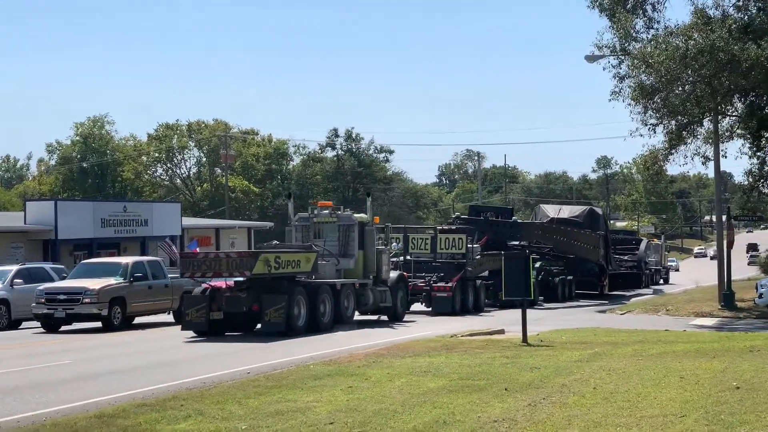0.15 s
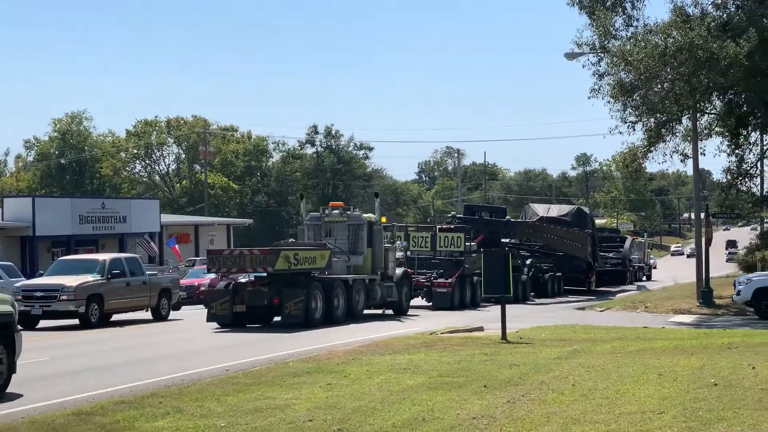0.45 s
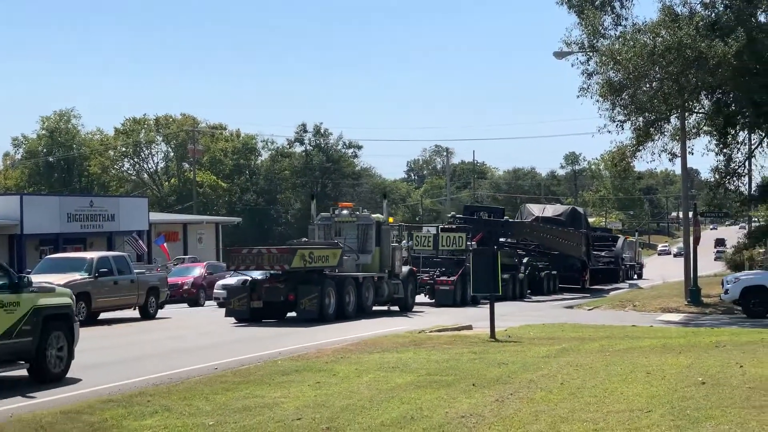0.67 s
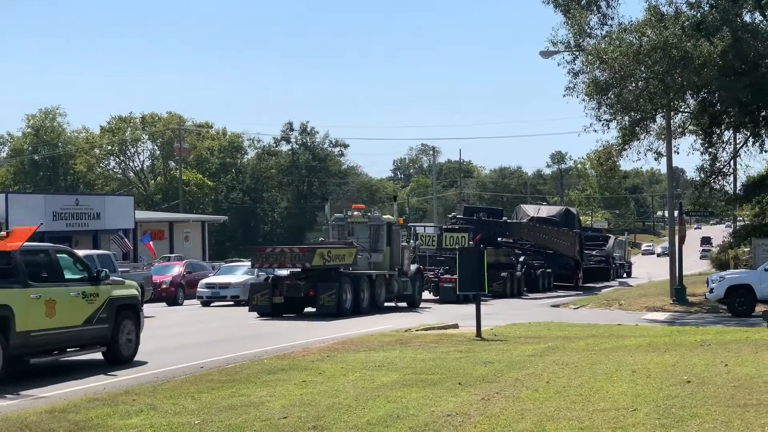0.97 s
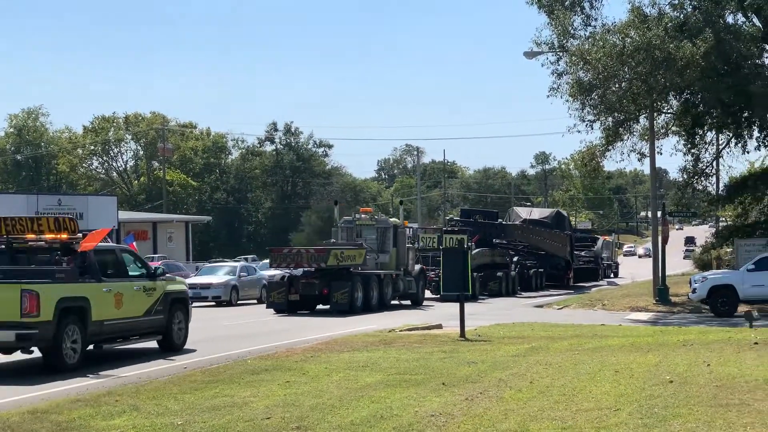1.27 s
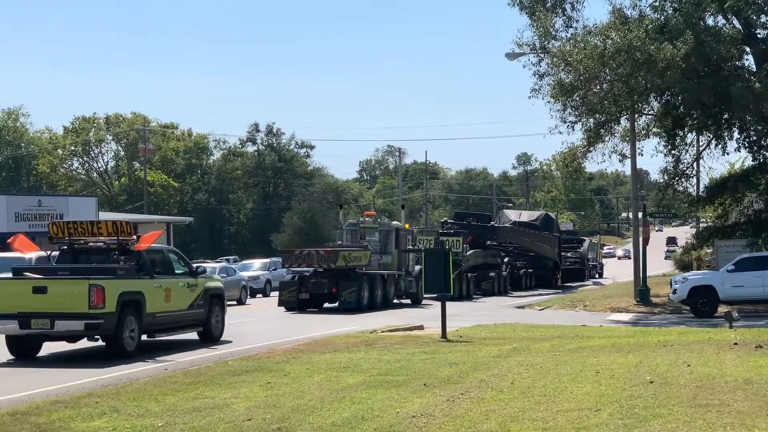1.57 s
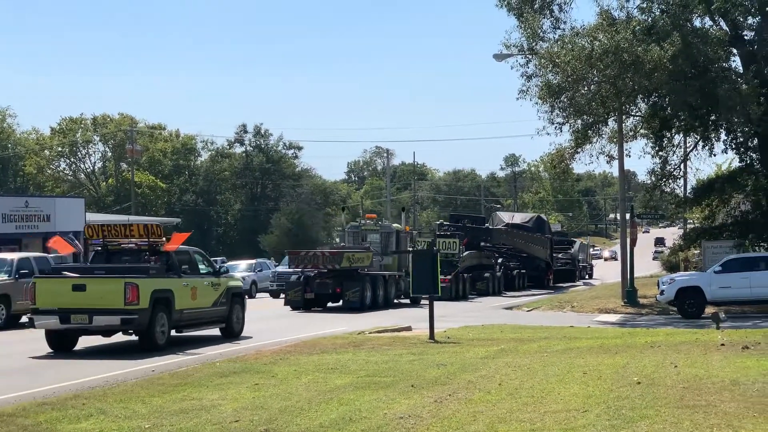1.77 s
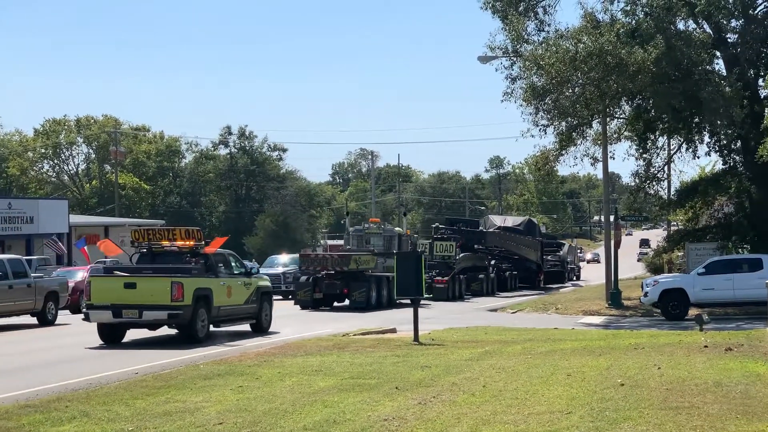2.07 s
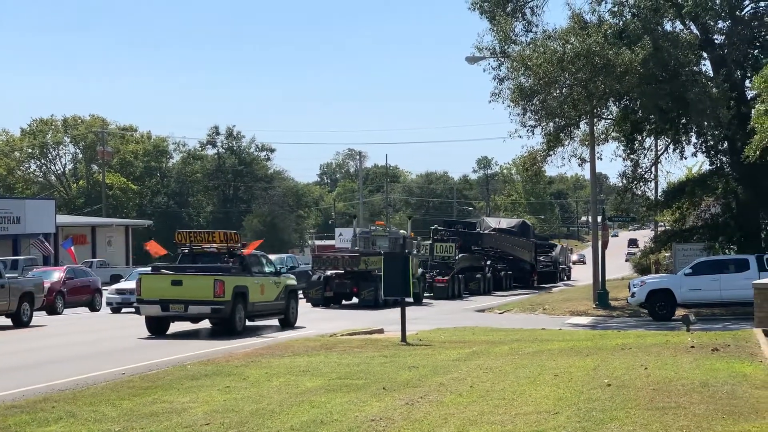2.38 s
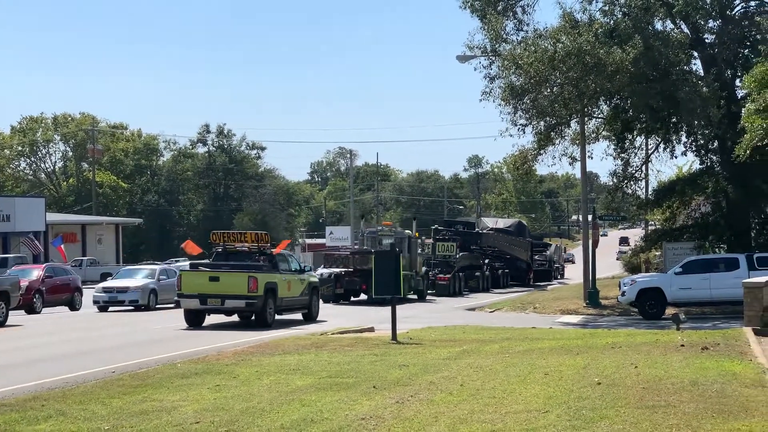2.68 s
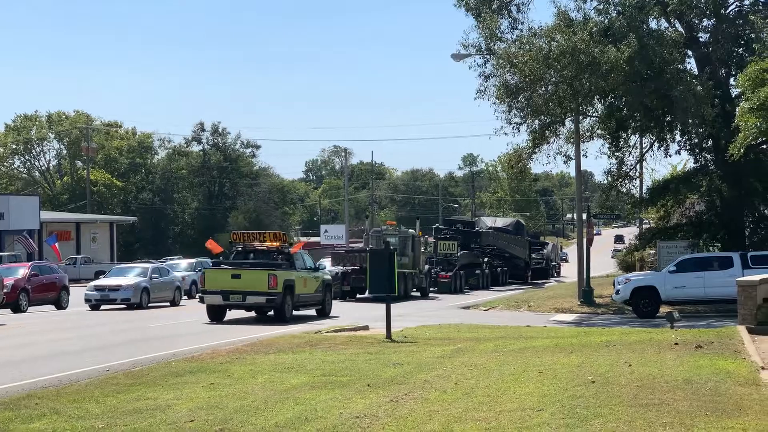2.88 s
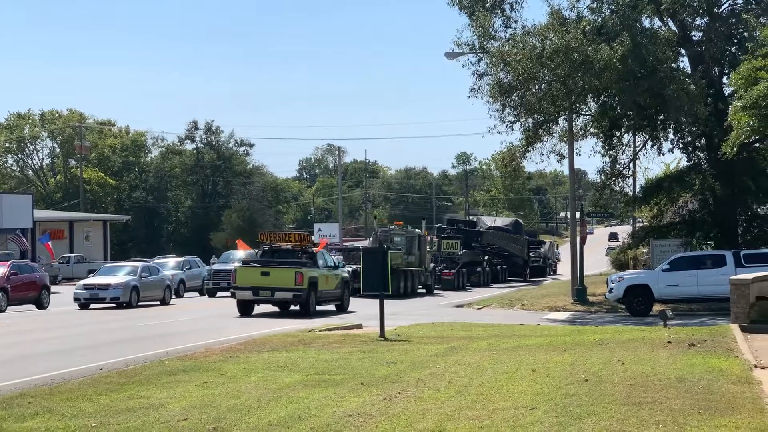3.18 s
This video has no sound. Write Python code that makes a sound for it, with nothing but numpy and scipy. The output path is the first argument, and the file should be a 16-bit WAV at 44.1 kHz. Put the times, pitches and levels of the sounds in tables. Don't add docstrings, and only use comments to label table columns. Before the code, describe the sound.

A heavy diesel truck roars and rattles close by, then recedes; a short two-tone horn toots, a pickup follows and revs up, trailer steel clanks over a bump. Outdoor roadside, phone stereo microphones on the verge.

```python
import sys
import numpy as np
from scipy import signal
from scipy.fft import rfft, irfft, next_fast_len
from scipy.io import wavfile

SR = 44100
rng = np.random.default_rng(int(sys.argv[2]) if len(sys.argv) > 2 else 0)


def int16_out(signal):
    q = np.round(np.clip(np.atleast_2d(signal).T, -1, 1) * 32767)
    wavfile.write(sys.argv[1], SR, q.astype(np.int16))


def boost(x):
    u = np.asarray(x, float) / 20
    return 10 ** u


N = 147294


def in_time(rows):
    s, *columns = np.transpose(rows)
    return [np.interp(np.arange(N) / SR, s, column) for column in columns]


def at_hz(rows, hz, axis=1):
    table = np.array(rows)
    return np.interp(np.log(hz + 1e-9), np.log(table[:, 0]), table[:, axis])


def rms_one(x):
    return x / np.sqrt(np.mean(x ** 2) + 1e-20)


def drift(rate):
    r = np.exp(-80 * np.pi * rate / SR)
    noise = rng.standard_normal(N // 40 + 2002)
    slow = signal.lfilter([1], [1, -2 * r, r * r], noise)[2000:]
    return np.interp(np.arange(N) / 40, np.arange(len(slow)), rms_one(slow))


def resonate(x, hz, width_hz):
    r = np.exp(-np.pi * width_hz / SR)
    zeros = np.array([1, 0, -1]) * (1 - r * r) / 2
    return signal.lfilter(zeros, [1, -2 * r * np.cos(2 * np.pi * hz / SR), r * r], x)


def resonate_twice(x, hz, width_hz, second_width_hz):
    return resonate(resonate(x, hz, width_hz), hz, second_width_hz)


def banded(spectrum, patchy_db):
    hz = np.fft.rfftfreq(N, 1 / SR)
    noise = rfft(rng.standard_normal(N)) * boost(at_hz(spectrum, hz))
    shared, out = drift(5.1), 0
    for centre_octave in np.arange(4, 14.6, .5):
        share = np.clip(1 - 2 * abs(np.log2(hz + 1e-9) - centre_octave), 0, 1)
        flicker_db = patchy_db * (0.33 * shared + drift(17.4))
        out = out + irfft(noise * share, N) * boost(flicker_db)
    return rms_one(out)


def orders(rate_hz, table, wobble_db, jitter):
    turn = 2 * np.pi * np.cumsum(rate_hz) / SR
    out = 0
    for k, db in table:
        level = boost(db + wobble_db * drift(5.6)) * np.sqrt(2)
        out = out + level * np.sin(k * turn + jitter * drift(1.6) + rng.uniform(0, 6.05))
    return out


# time in seconds, firing rate in Hz, nearness in dB, gear and chain rattle in dB.
TRUCK_DRIVE = [(0, 59.2, 2, 3), (.2, 59.27, 1, 4), (.35, 60.3, 3, 0.5), (.64, 57.8, 0, 2),
               (.99, 51.52, -1.5, 1.5), (1.3, 51.7, -3, -1), (1.65, 52.8, -16.5, -2.5),
               (1.9, 52.6, -12.5, -8), (2.3, 53.4, -29, -6), (2.6, 53.1, -13, -11), (2.75, 52.9, -15, -11),
               (3.34, 53, -13.5, -11)]
# multiple of the firing rate, level in dB.
TRUCK_ORDERS = [(1, -32), (2, -32), (3, -39), (4, -36), (5, -40), (7, -46)]
# frequency in Hz, density in dB per Hz.
TRUCK_ROAR = [(40, -61), (120, -1), (300, 0), (480, -9.5), (1400, -23), (3000, -30), (7000, -39),
              (15500, -55.5)]
# resonance in Hz, width in Hz, level in dB.
RATTLE_MODES = [(1449, 28, -47.5), (2468, 37, -53), (3095, 170, -44), (3614, 76, -48.5), (4024, 270, -39.5),
                (4754, 81, -50), (8380, 1800, -56.5)]
# time in seconds, level in dB.
PIPE_SONG = [
    (0, -29),
    (.12, -32),
    (.26, -32),
    (.33, -23),
    (.4, -35),
    (.6, -31),
    (.72, -25),
    (.95, -25),
    (1.04, -60),
]


def truck():
    rate_hz, near_db, rattle_db = in_time(TRUCK_DRIVE)
    chuff = 1 + 0.24 * np.cos(2 * np.pi * np.cumsum(rate_hz) / SR)
    roar = boost(-20 + near_db) * chuff * banded(TRUCK_ROAR, patchy_db=2)

    grains_per_s = 2500
    struck = rng.random(N) < grains_per_s * chuff / SR
    grains = struck * rng.standard_normal(N) + .1 * rng.standard_normal(N)
    rattle = 0
    for hz, width_hz, db in RATTLE_MODES:
        ring = resonate_twice(grains, hz, width_hz, 2 * width_hz)
        rattle = rattle + boost(db + 2.8 * drift(7)) * rms_one(ring)

    shift_s, ramp_s, shift_loss_db = 1.04, .07, -20
    load_db = shift_loss_db * np.clip((np.arange(N) / SR - shift_s) / ramp_s + 1, 0, 1)
    lug_db = .8 * (rate_hz.max() - rate_hz)
    note = boost(near_db + load_db + lug_db) * orders(rate_hz, TRUCK_ORDERS, 2, jitter=.6)
    song = boost(in_time(PIPE_SONG)[0]) * orders(rate_hz, [(6, 0)], 1, jitter=.6)
    return note + song + roar + boost(rattle_db) * rattle


def echoed(tone):
    far_s, far_hz = .115, 1350
    near_s, near_hz = .04462, 907
    far = resonate_twice(np.roll(tone, int(far_s * SR)), far_hz, 350, 350)
    near = resonate(np.roll(tone, int(near_s * SR)), near_hz, 300)
    return tone + boost(-5) * far + boost(-5) * near


# overtone number, low horn in dB, high horn in dB.
HORN_OVERTONES = [(1, -27, -35), (2, -33, -33), (3, -29, -36), (4, -28, -40), (5, -43, -46), (6, -48, -63),
                  (7, -43, -49), (7.8, -49, -41.5), (10.07, -53, -44.5), (11, -58, -56), (12, -53.5, -49.5),
                  (14, -60, -67), (18, -78, -52), (19.2, -54.5, -55), (21.5, -62, -49.5), (23, -76, -70),
                  (29, -88, -59), (33, -90, -79)]
# time in seconds, half width
# in seconds, level in dB, overtone number.
SHADOWS = [(.95, .04, -6, 1), (.96, .025, -5, 2), (1.1, .012, -7, 3), (.94, .04, -4, 3),
           (1.205, .035, -10, 3), (1.3, .012, -7, 3), (1.35, .01, -8, 3), (1.17, .022, -11, 4),
           (1.27, .015, -4, 4), (.96, .03, -6, 5), (1.19, .035, -9, 5)]


def horn():
    t = np.arange(N) / SR
    low_hz, high_hz = 451.3, 456.35
    on_s, off_s, ramp_s = .897, 1.342, .012
    in_step_s = 1.03
    gate = np.clip((t - on_s) / ramp_s, 0, 1) * np.clip((off_s - t) / ramp_s + 1, 0, 1)
    way = np.clip((t - on_s) / (off_s - on_s) - .5, -1, 1)
    late = np.minimum(abs(t - 1.213) / 0.093, 3)
    tone = 0
    for k in range(1, 34):
        shadow_db = sum(db * np.exp(-((t - s) / width_s) ** 2) for s, width_s, db, which in SHADOWS if which == k)
        sag_db = -7 * way * np.clip(k - 2.5, 0, 1) * (k < 5)
        swell_db = -4.5 * min(k, 20) / 20 * late
        low = boost(at_hz(HORN_OVERTONES, k) + sag_db + drift(2.0))
        high = boost(at_hz(HORN_OVERTONES, k, axis=2) + swell_db + drift(9.2))
        turn, start = 2 * np.pi * k * (t - in_step_s), rng.uniform(0, 6.25)
        pair = low * np.sin(low_hz * turn + start) + high * np.sin(high_hz * turn + start)
        tone = tone + boost(shadow_db) * echoed(gate * np.sqrt(2) * pair)
    return tone


# time in seconds, firing rate in Hz, level in dB.
PICKUP_DRIVE = [
    (0, 64.1, -48),
    (1.2, 62.2, -43),
    (1.85, 63.9, -29),
    (2.11, 62.3, -27),
    (2.3, 55.88, -30),
    (2.55, 57.55, -23),
    (2.9, 65.92, -25.5),
    (3.34, 74.13, -20.5),
]
# multiple of the firing rate, level in dB.
PICKUP_ORDERS = [(1, -1), (1.5, -10), (2, -9.5), (3, -11), (4, -16)]


def pickup():
    rate_hz, db = in_time(PICKUP_DRIVE)
    drone = rms_one(resonate(rng.standard_normal(N), 163, width_hz=4.1))
    return boost(db) * orders(rate_hz, PICKUP_ORDERS, 1.5, jitter=0.71) + boost(-31.5) * drone


def bursts(rows, t60_s):
    t = np.arange(N) / SR
    shape = 0
    for (s, db, *_), tail_s in zip(rows, t60_s):
        shape = shape + (t >= s) * boost(db - 60 * np.clip(t - s, 0, 1) / tail_s)
    knock = 7.0 * np.maximum(np.diff(shape, prepend=0), 0)
    return shape * rng.standard_normal(N) + knock


# time in seconds, peak in dB, t60 in seconds.
CLANKS = [(1.87, -24, 0.15), (2.112, -23, 0.034), (2.523, -16.5, 0.052), (2.53, -17.5, 0.072),
          (2.538, -21.5, .08), (2.556, -17.5, 0.074), (2.569, -24.5, 0.13), (2.588, -26, 0.092),
          (2.624, -35, 0.066), (2.739, -41, 0.044), (2.769, -26, 0.023)]
# resonance in Hz, width in Hz, level in dB.
STEEL_MODES = [(382, 81, -8), (555, 69, -13.5), (890, 105, -10.5), (1624, 250, -6), (1857, 290, -15),
               (2580, 430, -14), (3280, 570, -14.5), (5700, 2700, -16.5), (10000, 10000, -32.5)]


def clanks():
    blows = bursts(CLANKS, [row[2] for row in CLANKS])
    steel = 0
    for hz, width_hz, db in STEEL_MODES:
        gain = boost(db) * np.sqrt(SR / width_hz / 4)
        steel = steel + gain * resonate_twice(blows, hz, width_hz, 2 * width_hz)
    return steel


# time in seconds, peak in dB, resonance in Hz.
TICKS = [(.529, -40, 11400), (.546, -39, 11300), (.572, -40, 11300), (1.893, -44, 5500),
         (2.092, -39, 9400), (2.111, -37, 4500), (2.127, -44, 9000), (2.179, -44, 9200),
         (2.334, -39, 9600), (2.336, -46, 13000), (2.504, -43, 9200), (2.523, -30, 3100),
         (2.524, -37, 8700), (2.528, -29, 2500), (2.552, -33, 3400), (2.553, -41, 8700),
         (2.769, -31, 4200), (2.769, -27, 1500), (2.79, -23, 1500), (2.794, -31, 1450),
         (2.985, -37, 4100)]


def ticks():
    t60_s, width_hz = 0.02, 900
    ticking = 0
    for row in TICKS:
        ticking = ticking + resonate_twice(bursts([row], [t60_s]), row[2], width_hz, 3 * width_hz)
    return ticking * np.sqrt(SR / width_hz / np.pi)


# start in seconds, length in seconds, level in dB, centre in Hz, width in Hz.
PUFFS = [(0, 0.12, -55, 7130, 690), (0.523, .04, -54, 14100, 4400), (0.612, 0.031, -48, 13500, 6000),
         (1.615, .06, -57, 10000, 6800), (1.975, 0.075, -51, 11000, 9600), (2.087, 0.04, -55, 10900, 12000),
         (2.3, 0.27, -49, 4810, 170), (2.55, .22, -51, 4690, 170), (3.004, 0.15, -60, 11380, 15000),
         (2.2, 0.11, -48, 3090, 200), (2.17, 0.2, -47, 4040, 180), (.96, 0.08, -27, 243, 14),
         (1.358, 0.15, -34, 267, 46), (.3, .6, -51, 3095, 130), (.2, .25, -55, 6550, 400),
         (.8, .15, -57, 6500, 300), (1.5, .4, -57, 5450, 300), (2.95, .06, -59, 6050, 60),
         (2.95, .06, -59, 6720, 60)]


def puffs():
    t, out = np.arange(N) / SR, 0
    for s, length_s, db, hz, width_hz in PUFFS:
        rise = (t - s) / (0.19 * length_s)
        fall = (s + length_s - t) / (.5 * length_s) + 1
        shape = np.clip(np.minimum(rise, fall), 0, 1)
        hiss = rms_one(resonate_twice(rng.standard_normal(N), hz, width_hz, width_hz))
        out = out + shape * boost(db + 2.0 * drift(40)) * hiss
    return out


# frequency in Hz, density in dB per Hz.
ROAD_SPECTRUM = [(30, -19.5), (60, -1), (130, -1), (250, -7.5), (450, -16.5), (1400, -26), (6000, -40.5),
                 (11000, -53.5), (15500, -86)]


def road():
    return boost(-23) * banded(ROAD_SPECTRUM, patchy_db=2.67)


def scene():
    big, toot = truck(), horn()
    rest = pickup() + clanks() + ticks() + puffs() + road()
    big_right = big - 0.31 * resonate(big, 259, width_hz=200)
    toot_right = toot - .75 * resonate(toot, 1807, width_hz=200)
    return np.array([big + toot + rest, big_right + toot_right + rest])


def roll_off(x):
    return signal.sosfilt(signal.butter(12, 15660, fs=SR, output="sos"), x)


# frequency in Hz, level in dB, extra phase in radians, unlike share from 0 to 1.
MIC_PAIR = [(44.8, -3.5, -1.0, 0.063), (129, -4.5, -1.63, 0.18), (305, -9, -2.5, 0.54),
            (500, -5, -3.6, .75), (850, -6, -5.35, .35), (1200, -9, -6.4, .35), (1550, -9, -7.2, .7),
            (2300, -16, -5.3, .8), (3400, -13, -7.5, .8), (4100, -18, -6.9, .45), (5100, -10, -6.1, .7),
            (5900, -5, -5.8, .6), (6450, -1, -5.7, .2), (7400, 0, -6.55, .17), (8200, 0, -6.1, .1),
            (12000, 0, -6.25, .1)]


def record(dry):
    lead_s, smear_s = 9.4 / 44100, .25
    size = next_fast_len(N + SR)
    hz = np.fft.rfftfreq(size, 1 / SR)
    tail = np.arange(int(smear_s * SR)) / (smear_s * SR)
    smear = rfft(rms_one(rng.standard_normal(len(tail)) * np.exp(-3 * tail)), size)
    unlike = np.clip(at_hz(MIC_PAIR, hz, axis=3), 0, 1)
    turn = np.exp(1j * (at_hz(MIC_PAIR, hz, axis=2) + 2 * np.pi * hz * lead_s))
    path = np.sqrt(1 - unlike ** 2) * turn + unlike * smear / abs(smear)
    right = irfft(rfft(dry[1], size) * boost(at_hz(MIC_PAIR, hz)) * path, size)[:N]
    return roll_off(np.array([dry[0], right]))


dry = scene()
out = record(dry)
int16_out(out)
```